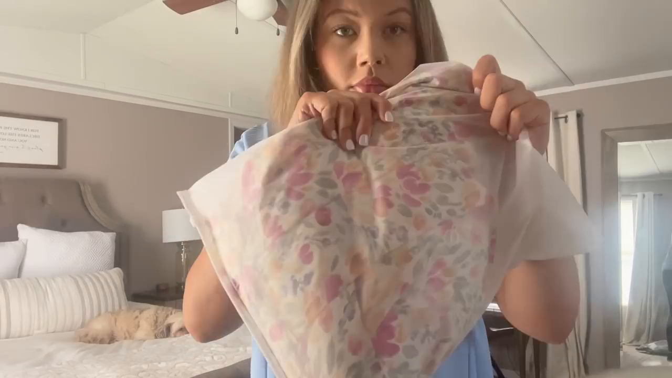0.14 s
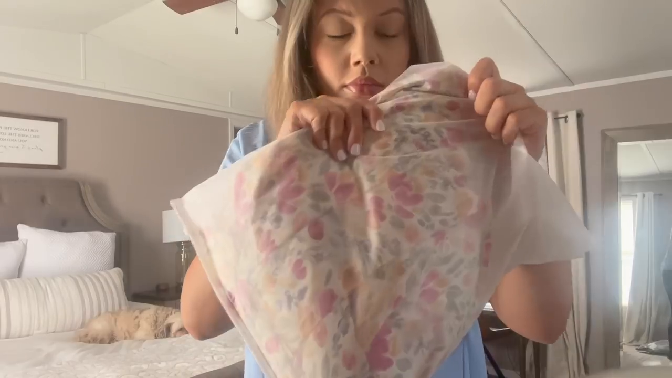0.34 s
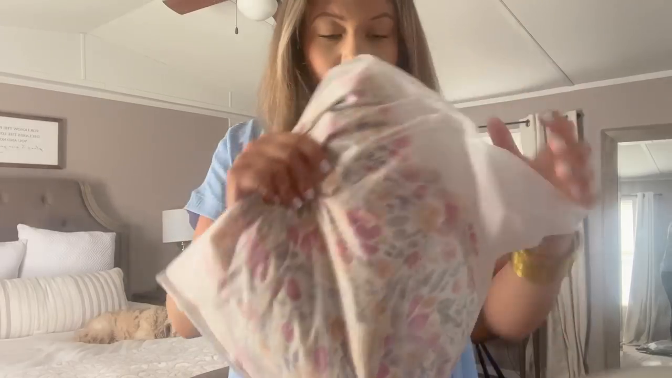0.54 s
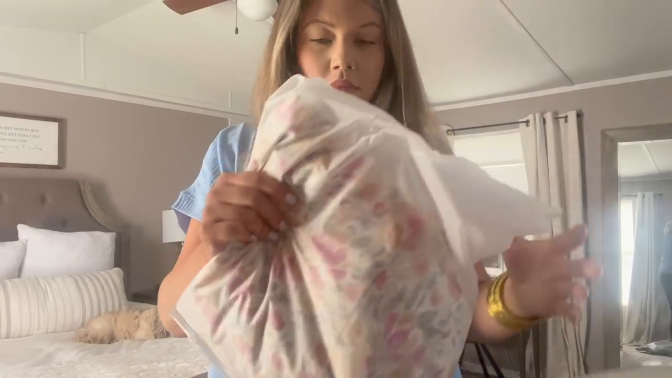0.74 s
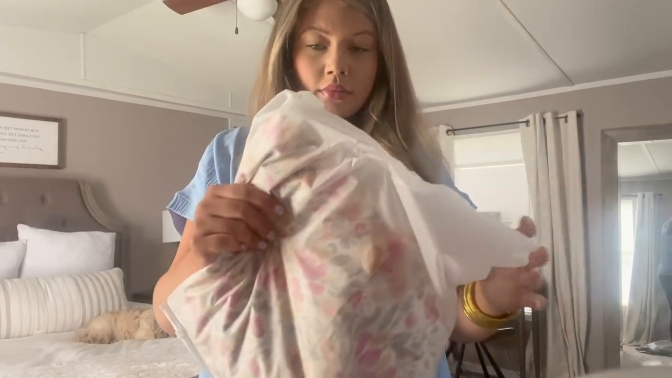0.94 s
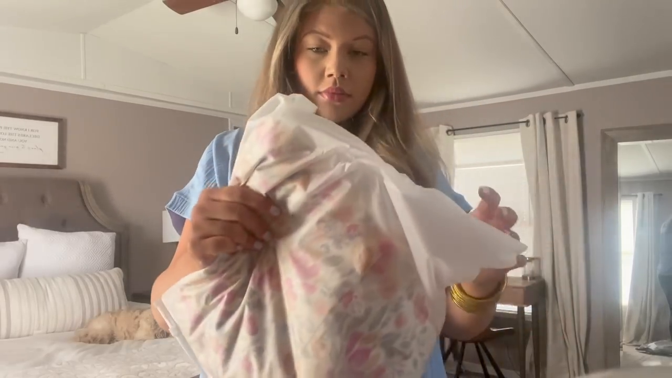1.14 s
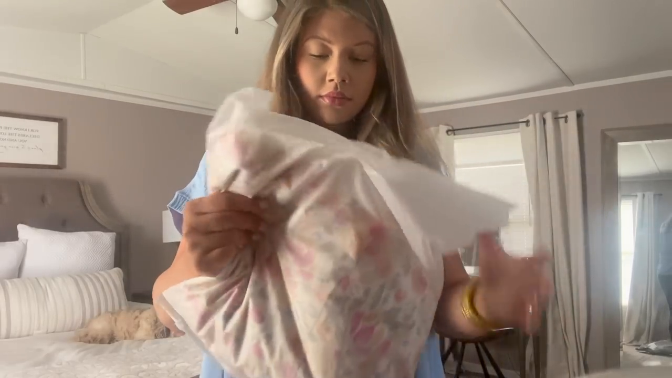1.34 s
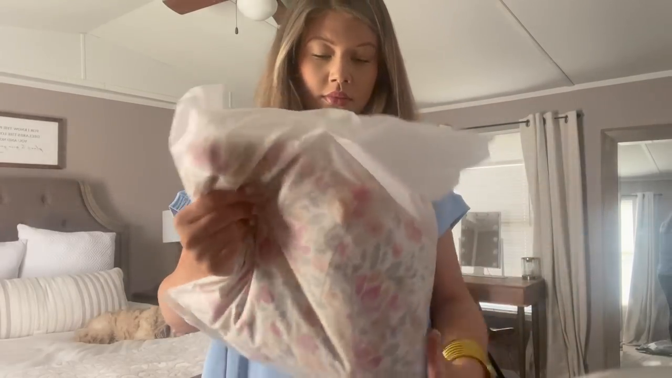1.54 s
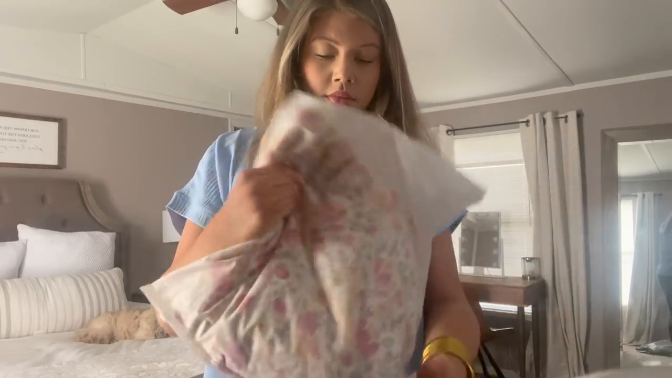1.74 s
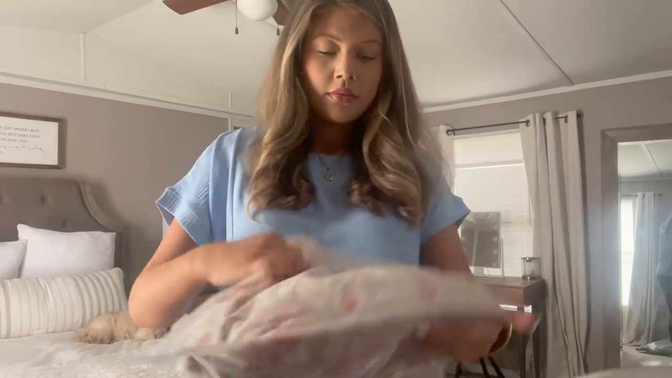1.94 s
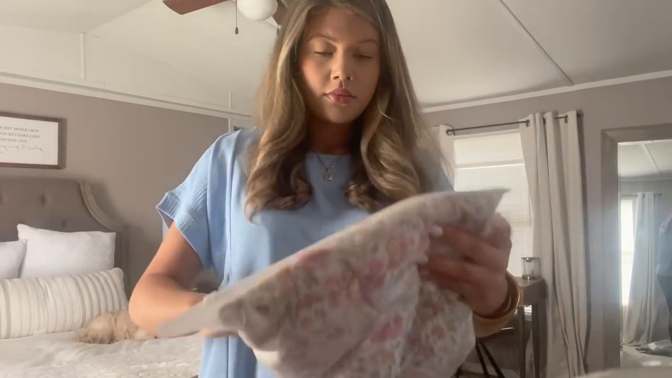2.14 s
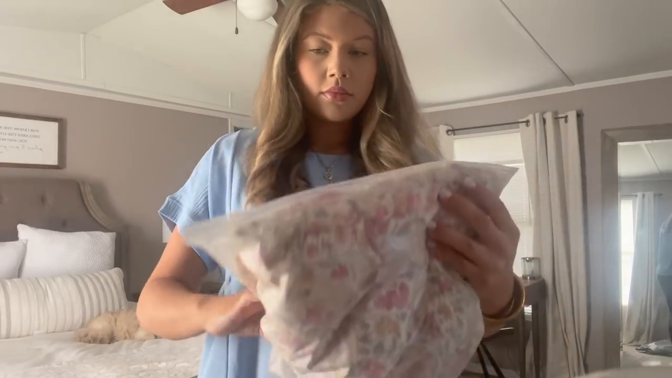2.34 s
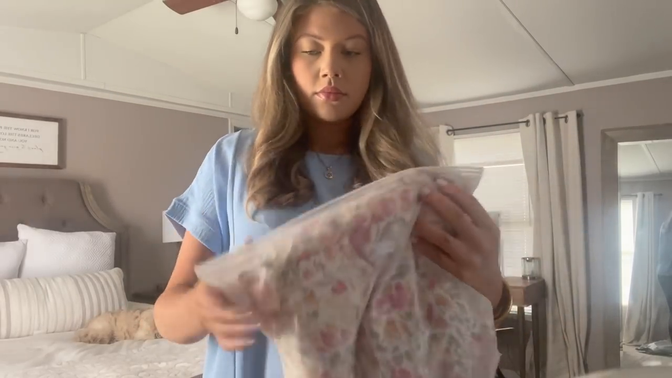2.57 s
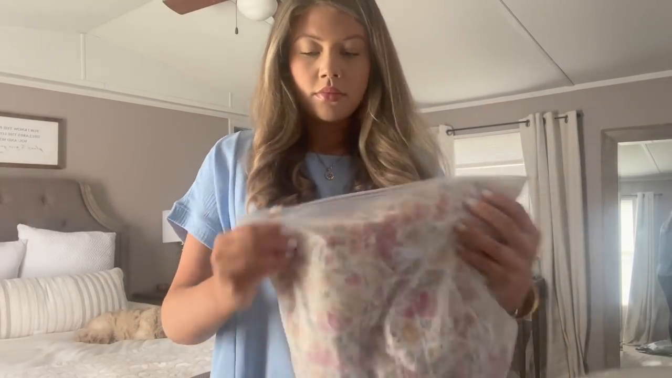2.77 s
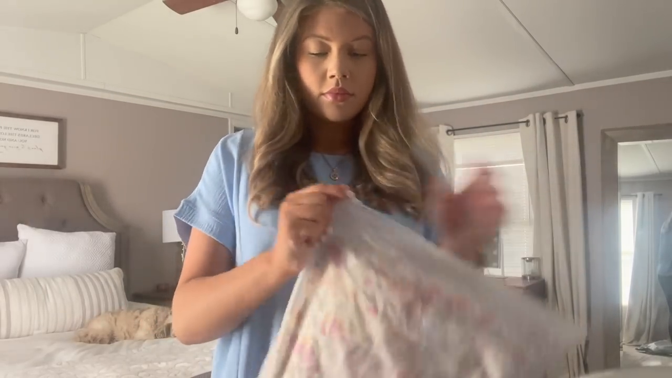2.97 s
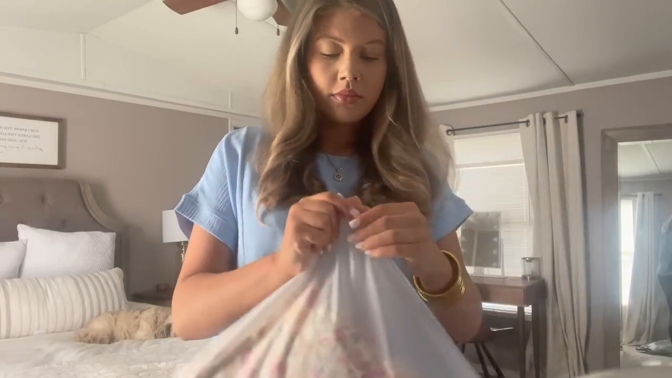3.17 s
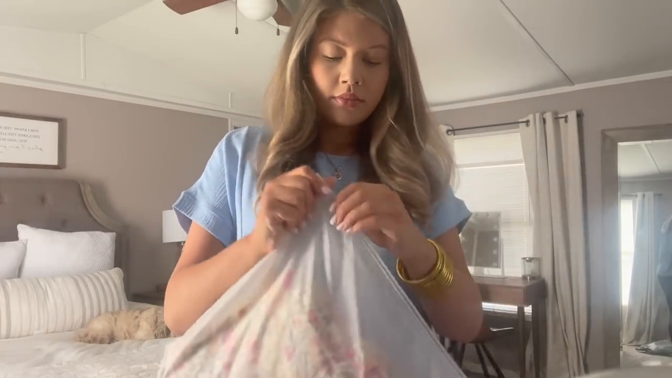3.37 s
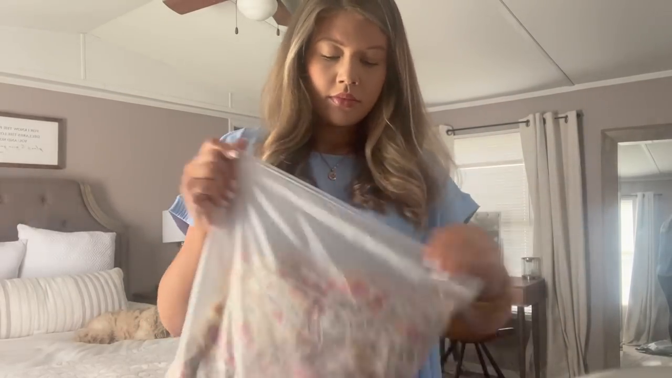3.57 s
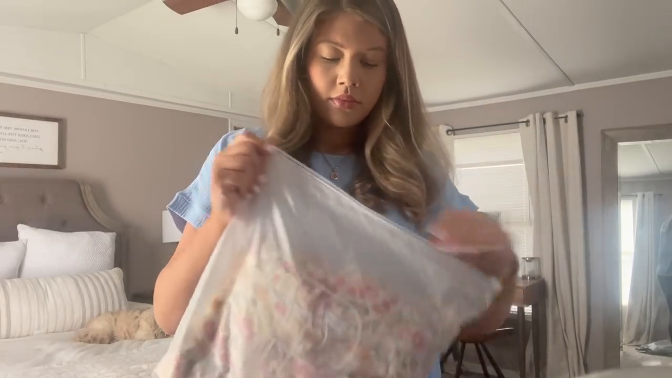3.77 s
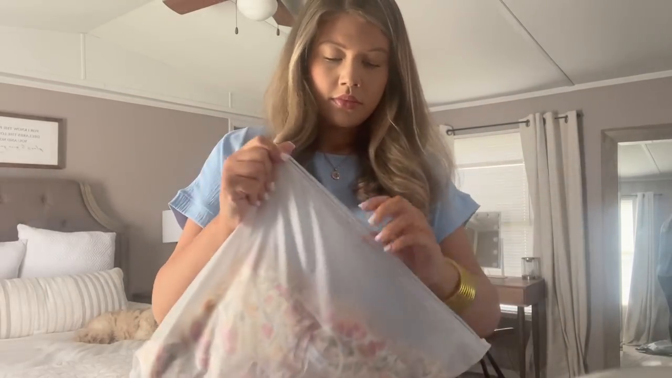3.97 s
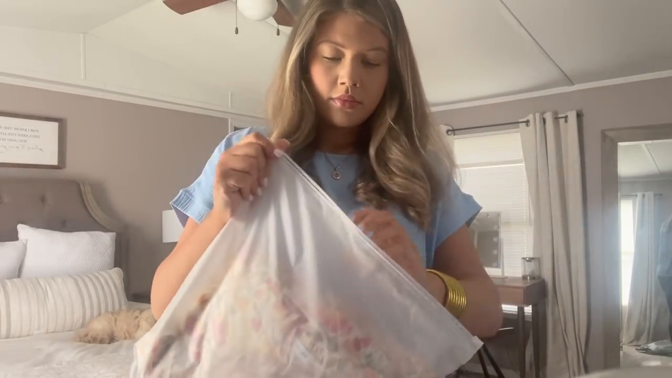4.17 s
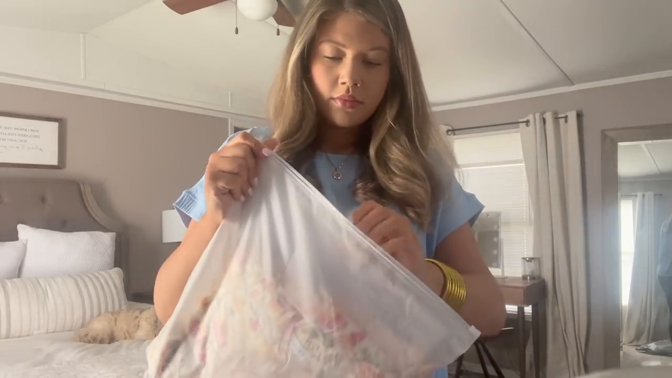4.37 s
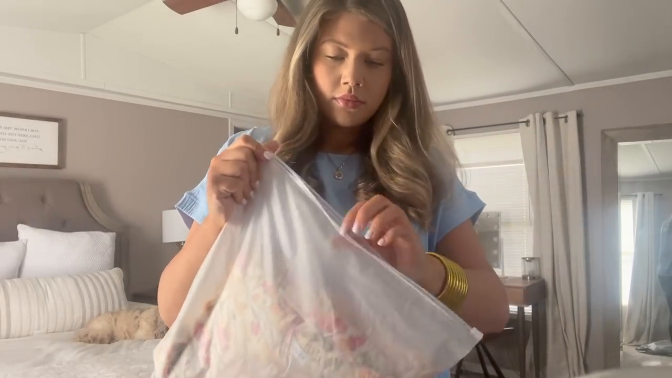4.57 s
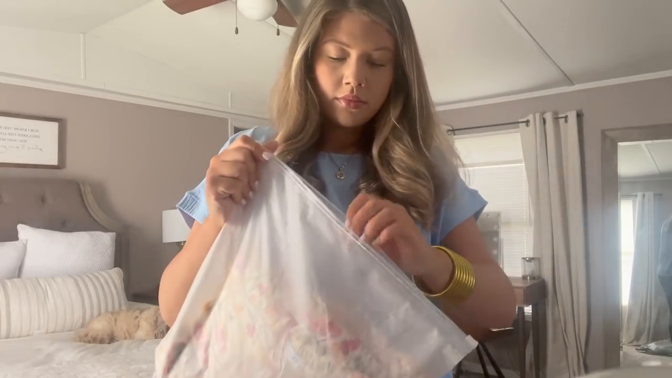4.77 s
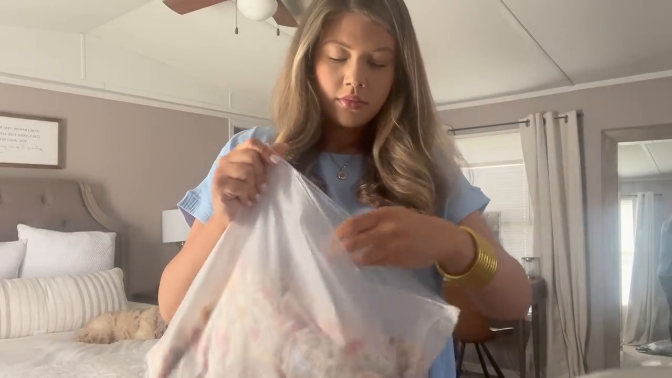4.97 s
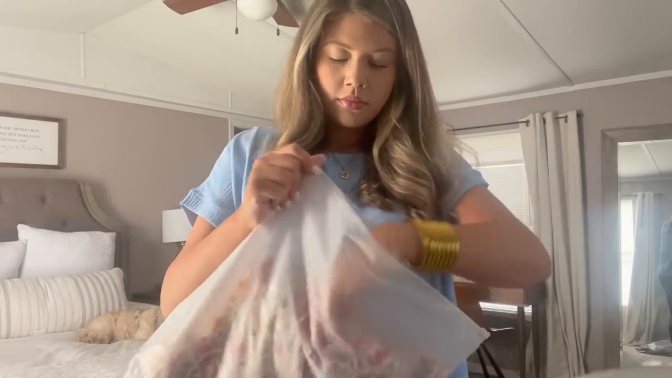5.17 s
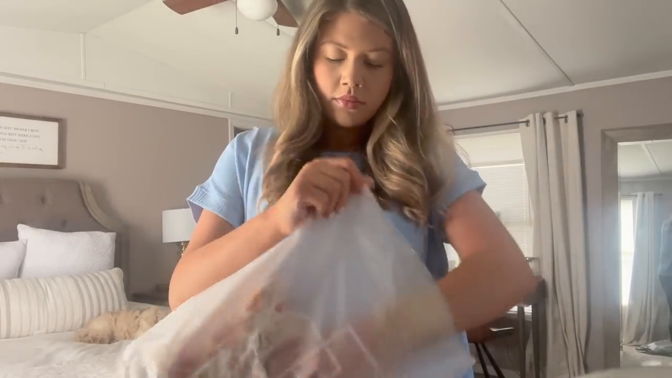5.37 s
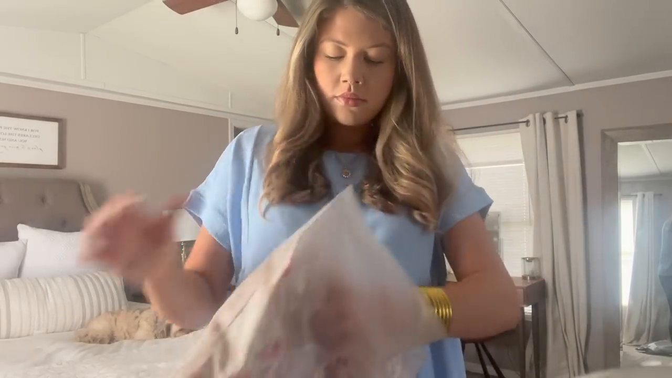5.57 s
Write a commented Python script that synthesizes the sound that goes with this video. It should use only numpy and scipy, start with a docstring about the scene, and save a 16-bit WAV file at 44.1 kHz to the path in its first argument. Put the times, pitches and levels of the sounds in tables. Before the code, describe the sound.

Thin plastic film snaps and rustles right by the microphone, with duller crumpling from the garment inside. After an early hard cut the handling comes in uneven bunches, loudest before three seconds, almost still around four and a half, then busy again with soft thumps. Small dry room, short reflections, quiet low hum.

```python
"""A quiet bedroom: hands turn, pull and open a thin plastic bag near a phone with two microphone ports.
Snapping creases are short noise bursts; a dense crackle and the duller crumple of the filled bag are
filtered grains, and soft low flops are decaying sines. Echoes of random sign make the room.
Filtered noise and a wavering mains hum lie underneath. Near the start the rustle and its echoes break
off and the hum skips in its cycle; the handling then builds up again."""
import sys
import numpy as np
from scipy import signal
from scipy.io import wavfile
from scipy.ndimage import uniform_filter1d

SR = 44100
rng = np.random.default_rng(int(sys.argv[2]) if len(sys.argv) > 2 else 0)


def wrap_up_sound(samples):
    """Save the sound to the file named by the first command line argument, as 16-bit audio."""
    columns = np.atleast_2d(samples).T
    # keep every value between -1 and 1, then stretch to whole-number steps
    tamed = np.clip(columns, -1, 1)
    steps = np.round(tamed * 32767).astype(np.int16)
    wavfile.write(sys.argv[1], SR, steps)


N = 247401  # length [samples]
BREAK_S = .141  # moment the rustle breaks off [s]


def gain_of(db):
    """Decibels to amplitude gain."""
    return 10 ** (np.asarray(db) / 20)


def evened(x):
    """Scales a signal to rms 1."""
    return x / np.sqrt(np.mean(x ** 2) + 1e-20)


def read(points, hz):
    """Reads a (frequency, value) table along a log-frequency axis."""
    f, value = np.transpose(points)
    return np.interp(np.log(hz + 1), np.log(f + 1), value)


def add(mix, s, sound):
    """Mixes a sound in from s seconds on, cut at the end of the mix."""
    part = mix[..., round(s * SR):][..., :sound.shape[-1]]
    part += sound[..., :part.shape[-1]]


def coloured(x, points):
    """Minimum-phase filter with the table's gain, so no sound comes ahead of its cause."""
    hz = abs(np.fft.fftfreq(4096, 1 / SR))
    log_gain = np.log(gain_of(read(points, hz)))
    phase = -signal.hilbert(log_gain).imag
    taps = np.fft.ifft(np.exp(log_gain + 1j * phase)).real[:2048]
    return signal.oaconvolve(x, taps)[:N]


def drift(cutoff_hz):
    """Slow random movement of rms near 1: low-passed noise at one point per 64 samples, joined by lines."""
    steps = rng.standard_normal(N // 64 + 2)
    smooth = signal.lfilter(*signal.butter(2, min(cutoff_hz * 128 / SR, .9)), steps)
    return np.interp(np.arange(N) / 64, np.arange(len(steps)), evened(smooth))


def alike(left, other, same):
    """Stereo pair whose right side shares the given part of the left, the rest being independent."""
    return np.array([left, same * left + np.sqrt(1 - same ** 2) * other])


def hum():
    """Mains hum: a sine and faint third harmonic, wavering in phase and level, with a skip at the break."""
    hum_hz, level_db, third_db = 50.23, -47, -21.0
    t = np.arange(N) / SR
    cycles = hum_hz * t + 0.014 * drift(4.2) + 0.75 * (t < BREAK_S)
    # drift moves the phase by about 0.014 cycles
    turn = 2 * np.pi * hum_hz * t + 2 * np.pi * (cycles - hum_hz * t)
    wave = np.sin(turn) + gain_of(third_db) * np.sin(3 * turn)
    side_db = np.array([[.45], [-.45]])
    return np.sqrt(2) * gain_of(level_db + 1.8 * drift(6.7) + side_db) * wave


def air():
    """Room tone: random short-time spectra, most alike on both sides in the bass."""
    # spectrum of the room tone: (frequency [Hz], relative level [dB])
    air_spectrum = [(36, -23), (62, -16), (78, 2.5), (101, -31), (146, -18.5), (203, -30), (479, -38),
                    (577, -57), (877, -59), (2870, -77), (6620, -60), (8540, -84), (11000, -64),
                    (16000, -79)]
    # left-right likeness: (frequency [Hz], likeness [0 to 1])
    air_same = [(60, 0.94), (130, 0.67), (300, 0.99), (700, 0.076), (16000, 0.022)]
    level_db = -55.5  # rms of both sides together
    frames, hz = N // 512 + 5, np.fft.rfftfreq(2048, 1 / SR)
    a, b, c, d = rng.standard_normal((frames, 1025, 4)).T
    same = np.clip(read(air_same, hz), -1, 1)[:, None]
    spectra = alike(a + 1j * b, c + 1j * d, same) * gain_of(read(air_spectrum, hz))[:, None]
    noise = signal.istft(spectra, nperseg=2048, noverlap=1536)[1][:, :N]
    return gain_of(level_db) * evened(noise)


def tail():
    """Sparse reflections of random sign, each band dying at its own speed, partly alike at both ports."""
    # decay of the echoes: (frequency [Hz], time to fall 60 dB [s])
    room_t60 = [(150, 0.2), (800, 0.061), (3000, 0.16), (12000, 0.087)]
    # likeness of the echoes at both ports: (frequency [Hz], likeness [0 to 1])
    room_same = [(100, 0.97), (300, 0.93), (700, 0.062), (3000, 0.062), (8000, 0.84), (14000, 0.99)]
    taps = np.zeros((2, SR // 2))
    at = np.arange(120, SR // 2 - 20, 20)  # one reflection in every 20 samples
    at = at + rng.integers(0, 20, (2, len(at)))
    np.put_along_axis(taps, at, rng.choice([-1., 1.], at.shape), 1)
    hz, t, (left, other) = signal.stft(taps, SR, nperseg=512, noverlap=384)
    same = np.clip(read(room_same, hz), -1, 1)[:, None]
    fall = gain_of(-60 * t / read(room_t60, hz)[:, None])
    fall /= np.linalg.norm(fall, axis=1, keepdims=True)  # the same energy in every band
    echoes = signal.istft(alike(left, other, same) * fall, SR, nperseg=512, noverlap=384)[1]
    return echoes / np.linalg.norm(echoes[0])


def room(x, tails):
    """The bag keeps moving, so its sound hands over from one set of reflections to the next."""
    # colour of the reverberation: (frequency [Hz], level [dB])
    room_level = [(150, -6), (700, -3.5), (3000, -0.5), (8000, 0), (14000, -7)]
    turn = 2 * np.pi * 1.7 * np.arange(N) / SR
    x = np.array([coloured(side, room_level) for side in x])
    wet = np.zeros((2, N))
    for k, echoes in enumerate(tails):
        part = x * np.sqrt(2 / 3) * np.cos(turn + k * np.pi / 3)
        wet += signal.fftconvolve(part, echoes, axes=1)[:, :N]
    return wet


def ports(x, scatter):
    """Two ports round the phone's body: a balance and a lag that wanders as other parts of the bag sound."""
    # mean lag between the ports: (frequency [Hz], left lead [rad])
    port_phase = [(0, 0), (340, .3), (600, 1.5), (800, -1.1), (1120, 0), (1460, .8), (3000, 1.2),
                  (4600, -1.1), (6200, -1.3), (7300, -3.1), (8700, -3.4), (10700, -6), (12500, -6.4),
                  (14500, -9.2), (17000, -9.5)]
    # balance between the ports: (frequency [Hz], left over right [dB])
    port_tilt = [(60, 1.0), (110, -0.5), (200, -1.5), (380, -0.5), (700, 4.0), (1290, -1.0), (2380, 0.0),
                 (4400, 2.0), (8120, 1.0), (15000, 0.0)]
    # wander of the lag, before scatter: (frequency [Hz], lead [rad])
    port_wander = [(100, .2), (400, .7), (700, 1.6), (1200, .5), (2000, 1.4), (4000, 1.9), (6800, 1.4),
                   (8000, .4), (9800, 1.05), (11500, .15), (12400, .15), (13700, .95), (15000, .15)]
    hz, t, z = signal.stft(x, SR, nperseg=512, noverlap=384)
    wander = rng.standard_normal((len(t), len(hz))).T
    for size, axis in [(24, 0), (24, 0), (4, 1)]:  # smoothed twice over frequency, once over time
        wander = uniform_filter1d(wander, size=size, axis=axis)
    mean_lead = np.interp(hz, *np.transpose(port_phase))[:, None]
    lead = mean_lead + scatter * read(port_wander, hz)[:, None] * evened(wander)
    half = gain_of(read(port_tilt, hz)[:, None] / 2) * np.exp(.5j * lead)  # each port takes half
    return signal.istft(z * [half, 1 / half], SR, nperseg=512, noverlap=384)[1][:, :N]


def flops():
    """Soft blows of the filled bag against hands and body push air: low sines that swell and die fast."""
    # the blows: (time [s], level before the swell and fall [dB], ring [Hz])
    blows = [(1.489, -38, 119), (1.813, -35.5, 287), (1.939, -37, 197), (2.777, -36, 282), (3.6, -28.5, 81),
             (4.892, -30.5, 316), (5.13, -49, 325), (5.251, -34, 287)]
    out, t = np.zeros(N), np.arange(8000) / SR
    for s, db, hz in blows:
        swell = 1 - np.exp(-t / .005)
        fall = gain_of(db + 2 - 900 * t)  # 900 dB per second
        add(out, s, fall * swell * np.sin(2 * np.pi * hz * t))
    return out


def effort(t):
    """How hard the bag is handled: crumple and crackle levels [dB] at the times t."""
    # the hands' work: (time [s], crumple level [dB], crackle level [dB])
    hands = [(0, -47, -49), (.06, -47.5, -53), (.138, -47.5, -44), (0.145, -100, -100), (.25, -92, -82),
             (.285, -71, -77), (.303, -60, -55.5), (.4, -49.5, -61), (.5, -58, -62), (.6, -52, -58),
             (.66, -61, -67), (.76, -59.5, -64), (.85, -66, -69), (.92, -63, -71), (.99, -73.5, -77),
             (1.025, -87, -83), (1.045, -74, -68), (1.12, -75, -80), (1.2, -71, -70.5), (1.24, -69, -61),
             (1.3, -57, -61), (1.45, -61, -65), (1.5, -55, -51.5), (1.55, -51.5, -47.5), (1.66, -58.5, -66),
             (1.71, -55, -59), (1.76, -44.5, -47.5), (1.86, -48.5, -50), (1.96, -46.5, -49),
             (2.04, -49.5, -56), (2.12, -55.5, -57.5), (2.28, -57, -62.5), (2.34, -52.5, -52.5),
             (2.4, -49, -47.5), (2.49, -53.5, -51), (2.56, -50.5, -47.5), (2.62, -45, -48),
             (2.72, -52, -49.5), (2.8, -44.5, -42.5), (2.87, -50.5, -50), (2.98, -45.5, -43.5),
             (3.1, -45, -44.5), (3.15, -53.5, -50.5), (3.2, -57.5, -59.5), (3.3, -61.5, -73),
             (3.36, -57.5, -63.5), (3.45, -52.5, -56), (3.58, -46, -42), (3.68, -47.5, -55.5),
             (3.77, -46, -69), (3.87, -50.5, -57.5), (3.93, -51, -59.5), (4.0, -69, -78), (4.02, -72, -61),
             (4.055, -60, -75), (4.07, -54.5, -62.5), (4.19, -63, -74), (4.21, -74, -75), (4.255, -70, -83),
             (4.27, -68, -69), (4.34, -81.5, -89), (4.48, -79.5, -87), (4.492, -60, -73),
             (4.58, -61.5, -70.5), (4.63, -56.5, -66), (4.72, -62, -86), (4.78, -58, -63),
             (4.87, -47.5, -58), (4.91, -44.5, -58), (5.02, -47, -54), (5.09, -48, -57),
             (5.15, -39.5, -49.5), (5.22, -45.5, -46.5), (5.275, -39.5, -42.5), (5.335, -50.5, -53.5),
             (5.39, -48, -46.5), (5.5, -46, -46), (5.6, -48.5, -52)]
    s, crumple_db, crackle_db = np.transpose(hands)
    return np.interp(t, s, crumple_db), np.interp(t, s, crackle_db)


def grains(per_s, spread_db, clump_db, clump_hz, smooth):
    """Tiny buckles of many sizes that come in clumps, over the even hiss of film sliding on film."""
    sizes = gain_of(spread_db * np.minimum(rng.exponential(1, N), 3))
    struck = rng.random(N) < per_s / SR
    buckles = evened(sizes * rng.choice([-1, 1], N) * struck)
    hiss = smooth * rng.standard_normal(N)
    return (buckles + hiss) * gain_of(clump_db * drift(clump_hz))


def handling():
    """Dull crumple of the filled bag and bright crackle of its film: filtered grains that follow the hands."""
    # colour of the crumple: (frequency [Hz], relative level [dB])
    crumple_spectrum = [(60, -18), (120, -6), (285, -1), (600, -3), (1200, -6), (1800, -15.5), (3000, -14),
                        (4500, -21.5), (7000, -36)]
    # colour of the crackle: (frequency [Hz], relative level [dB])
    crackle_spectrum = [(300, -20.5), (1000, 7.5), (2000, 4), (4000, 1.2), (6000, 4), (8500, 0.5),
                        (11000, -3.5), (13000, 3), (15500, -9.5), (16000, -18)]
    crumple_db, crackle_db = effort(np.arange(N) / SR)
    dull = grains(per_s=700, spread_db=4., clump_db=2.5, clump_hz=35, smooth=.6)
    bright = grains(per_s=1900, spread_db=4.0, clump_db=0.0, clump_hz=74.0, smooth=1.0)
    crumple = evened(coloured(dull, crumple_spectrum))
    crackle = evened(coloured(bright, crackle_spectrum))
    return gain_of(crumple_db) * crumple + gain_of(crackle_db) * crackle


def small_snaps():
    """Lesser creases flip at random moments, as strong as the handling allows."""
    count, pitch_scatter_db = 160, 2.0  # the scatter turns into a frequency ratio
    s, luck = rng.random(count) * N / SR, rng.standard_normal((count, 5))
    crumple_db, crackle_db = effort(s)
    crack_db = crackle_db - 2.5 + luck[:, 0]
    puff_db = crumple_db + 2 + luck[:, 1]
    edge_db = crackle_db - 11 + luck[:, 2]
    crack_hz = 3300 * gain_of(pitch_scatter_db * luck[:, 3])
    puff_hz = 850 * gain_of(pitch_scatter_db * luck[:, 4])
    return np.c_[s, crack_db, crack_hz, puff_db, puff_hz, edge_db]


def burst(chance, hz, spread, t60, flip, order):
    """A jolt, a dying puff of noise and a faint crackle of settling film, in a band round hz, peak 1."""
    rise_s, fray_db, fray_t60 = .0004, -26, .02
    t = np.arange(len(chance)) / SR
    band = signal.butter(order, np.clip([hz / spread, hz * spread], 50, 16000), "band", fs=SR)
    jolt = flip * (np.arange(len(t)) == round(rise_s * SR))  # a single sample
    fray = gain_of(fray_db - 60 * t / fray_t60) * abs(chance[::-1])
    fall = gain_of(-60 * t / t60) + fray
    rise = np.minimum(t / rise_s, 1) ** 2
    sound = signal.lfilter(*band, (chance + jolt) * rise * fall)
    return sound / abs(sound).max()


def snaps():
    """A crease flips: a broad dry crack with a sharp edge, and a duller puff from the panel around it."""
    # the loudest creases: (time [s], crack level [dB], crack pitch [Hz],
    # puff level [dB], puff pitch [Hz], sharp edge level [dB])
    big_snaps = [(0.0393, -26.5, 4100, -36, 1130, -43), (0.0427, -28, 3400, -47, 795, -56),
                 (0.0863, -22, 4270, -49, 1330, -37), (0.1181, -36, 4400, -39, 970, -46),
                 (0.1254, -28, 3270, -43, 1010, -54), (0.1316, -16, 4500, -27.5, 1610, -24),
                 (0.1355, -30, 3180, -58, 1510, -46), (0.301, -39, 4900, -46, 1090, -56),
                 (0.326, -33, 3280, -39.5, 1570, -61), (0.336, -44, 5600, -55, 900, -60),
                 (0.352, -42, 3600, -38, 1090, -60), (0.3815, -33.5, 4050, -30.5, 845, -63),
                 (0.389, -32, 3100, -31.5, 1460, -48), (0.4112, -34, 3800, -37, 1160, -58),
                 (0.4252, -39.5, 3400, -49, 1140, -56), (0.4288, -39, 2200, -33, 1180, -56),
                 (0.4409, -16.5, 3330, -27.5, 1310, -46), (0.5312, -21, 3830, -29.5, 980, -45),
                 (0.5858, -36, 2610, -44, 930, -57), (0.6756, -42, 4100, -64, 1240, -61),
                 (0.6796, -34, 3080, -38, 730, -42), (0.6839, -37, 3600, -42, 790, -62),
                 (0.7497, -39, 4500, -55, 920, -67), (0.7775, -46, 3500, -39, 1200, -67),
                 (0.7844, -35, 2900, -37.5, 1140, -68), (0.7916, -45, 2600, -45, 834, -68),
                 (0.8327, -47, 2600, -40, 1160, -70), (0.8686, -47, 3400, -68, 1030, -65),
                 (0.9005, -55, 3100, -41.5, 730, -69), (0.913, -60, 2600, -61, 950, -70),
                 (0.955, -64, 2500, -53, 790, -70), (1.037, -58, 3500, -62, 1500, -57),
                 (1.054, -60, 4000, -56, 900, -70), (1.111, -55, 3300, -60, 800, -72),
                 (1.199, -60, 2400, -55, 1300, -70), (1.147, -60, 2200, -47.5, 840, -78),
                 (1.2341, -48, 3000, -56, 1220, -62), (1.2382, -36, 5740, -48, 1000, -53),
                 (1.251, -37, 3100, -40, 816, -45), (1.2727, -44, 4900, -58, 660, -43.5),
                 (1.3114, -39, 4700, -49, 740, -60), (1.4085, -39.5, 4200, -44, 1070, -58),
                 (1.4145, -29, 5540, -39, 1000, -59), (1.4524, -34.5, 3780, -41.5, 900, -61),
                 (1.4579, -50, 2900, -51, 970, -62), (1.4961, -18.5, 4700, -36, 1290, -31),
                 (1.5017, -33, 6400, -40, 1260, -52), (1.526, -25, 3800, -44, 1020, -42),
                 (1.5294, -37, 3300, -38, 1100, -35), (1.5442, -25, 3700, -35, 1350, -36),
                 (1.5477, -18, 6000, -51, 1220, -43), (1.5587, -40, 3700, -32, 1350, -40),
                 (1.5792, -41, 2600, -37.5, 785, -42), (1.6077, -55, 3000, -41, 860, -52),
                 (1.6716, -50, 2600, -40.5, 1050, -42), (1.703, -28, 6000, -51, 770, -49),
                 (1.7271, -35, 3200, -33.5, 820, -50), (1.7301, -33, 4100, -39, 970, -40),
                 (1.7443, -38, 2600, -38, 1400, -55), (1.7535, -27, 6000, -46, 740, -33),
                 (1.7666, -36, 3700, -31, 1030, -41), (1.7809, -29, 5360, -31.5, 670, -43),
                 (1.8204, -26, 3400, -27, 830, -37), (1.8238, -42, 3400, -28, 875, -57),
                 (1.8313, -28, 6100, -47, 880, -40), (1.8463, -28, 4500, -34, 1310, -42),
                 (1.8674, -38, 5600, -27, 1100, -46), (1.892, -23, 4700, -45, 1090, -36),
                 (1.938, -27, 4300, -30, 760, -58), (1.9432, -35, 5200, -37, 790, -50),
                 (1.9694, -9.5, 4660, -31.5, 1230, -34), (2.0626, -22.5, 4400, -33, 1260, -42),
                 (2.0684, -44, 4600, -48, 1070, -30), (2.1082, -26, 5400, -60, 1060, -40),
                 (2.1598, -53, 2380, -33.5, 1130, -61), (2.2718, -26, 6500, -60, 590, -54),
                 (2.286, -29, 5470, -33.5, 1440, -56), (2.3596, -27, 2500, -27.5, 1220, -26.5),
                 (2.3645, -43, 3100, -44, 1090, -36), (2.3802, -17, 4300, -36, 1220, -38),
                 (2.391, -47, 4000, -29, 1120, -53), (2.3929, -31, 5500, -37, 1200, -41),
                 (2.3972, -20, 4700, -48, 1080, -40), (2.4207, -16.5, 3470, -24.5, 1250, -27),
                 (2.4262, -35, 4000, -44, 1270, -30), (2.4311, -30, 5500, -41, 1180, -39),
                 (2.4994, -15, 5050, -24, 1140, -35), (2.5109, -53, 3000, -26.5, 1100, -42),
                 (2.529, -19, 5160, -28.5, 935, -25), (2.567, -31, 6200, -45, 1140, -41),
                 (2.5878, -30, 4100, -28, 950, -42), (2.5914, -26, 4670, -35, 1040, -34),
                 (2.6062, -20, 4200, -25.5, 724, -32), (2.6107, -14, 5700, -31, 840, -36),
                 (2.638, -39, 4900, -42, 1120, -48), (2.6597, -40, 5100, -31, 980, -48),
                 (2.684, -38, 4100, -50, 910, -48), (2.6893, -17, 4940, -36, 1200, -35),
                 (2.694, -47, 3700, -50, 1400, -46), (2.7021, -43, 3000, -40, 770, -46),
                 (2.7256, -15.5, 5640, -50, 1170, -49), (2.7287, -12, 5470, -32.5, 1100, -45),
                 (2.744, -36, 5400, -47, 1250, -39), (2.7638, -37, 5300, -32.5, 920, -52),
                 (2.7803, -5, 3640, -22.5, 1150, -42), (2.7848, -21, 3300, -29, 950, -43),
                 (2.791, -27, 4600, -38, 1010, -33), (2.7943, -18, 3200, -31, 1220, -40),
                 (2.8026, -14.5, 3900, -41, 970, -25.5), (2.8068, -32, 4130, -49, 830, -47),
                 (2.9004, -21, 4600, -34, 1100, -39), (2.9062, -30, 5200, -41, 1430, -41),
                 (2.9214, -22, 5200, -43, 620, -38), (2.9522, -31, 3500, -32.5, 1190, -44),
                 (2.964, -49, 3100, -35, 1090, -49), (3.043, -50, 3500, -35, 990, -45),
                 (3.055, -40, 3500, -40, 1200, -36), (3.0681, -50, 3720, -31, 764, -27),
                 (3.105, -36, 3500, -35, 990, -29), (3.1929, -35, 3380, -37.5, 1390, -35),
                 (3.2578, -31.5, 6040, -60, 790, -31), (3.2614, -59, 5100, -69, 940, -45),
                 (3.3262, -63, 3320, -63, 910, -57), (3.372, -26, 3800, -35, 1330, -45),
                 (3.376, -45, 2900, -41, 1000, -51), (3.3984, -29, 4140, -32.5, 1180, -48),
                 (3.4662, -52, 3800, -31.5, 990, -40), (3.5399, -20, 3330, -28.5, 1190, -53),
                 (3.5613, -23, 4700, -50, 1340, -40), (3.576, -22.5, 4570, -52, 1170, -46.5),
                 (3.607, -25, 3500, -25, 1240, -42.5), (3.6107, -24, 2690, -35, 1080, -43),
                 (3.6269, -23, 4300, -34, 470, -44), (3.7105, -23.5, 4140, -40, 900, -61),
                 (3.7198, -29, 3520, -33, 880, -58), (3.7239, -28, 2780, -36, 790, -61),
                 (3.735, -49, 3700, -33, 1050, -68.5), (3.7665, -31.5, 5270, -47, 900, -54),
                 (3.7766, -57, 2600, -46, 590, -66), (3.7859, -33, 4000, -59, 1000, -51),
                 (3.8382, -34, 3600, -45, 880, -43), (3.843, -31, 3800, -40, 694, -37),
                 (3.857, -36, 3400, -36, 1330, -56), (3.8612, -42, 2400, -36, 1400, -60.5),
                 (3.9037, -33, 3200, -35.5, 1350, -48), (3.9865, -65, 2300, -69, 570, -64),
                 (4.0127, -44, 5200, -64, 500, -48), (4.0181, -44, 5800, -71, 520, -60),
                 (4.0354, -37, 4200, -62, 1070, -57), (4.0628, -33, 3970, -43, 900, -59),
                 (4.075, -53, 6000, -69, 900, -58), (4.085, -50, 2900, -62, 1100, -60),
                 (4.158, -57, 3800, -51, 1090, -58), (4.1828, -49, 2380, -70, 710, -77.5),
                 (4.2587, -43, 4060, -59, 1100, -48), (4.2632, -48.5, 3970, -51, 1260, -49),
                 (4.36, -71, 2200, -72, 800, -77), (4.385, -69, 2000, -62, 950, -77),
                 (4.42, -73, 2300, -77, 900, -78), (4.49, -55, 3500, -62, 860, -59),
                 (4.516, -53, 2400, -55, 1240, -65), (4.533, -57, 2400, -45.5, 1000, -63),
                 (4.5408, -45, 2500, -39.5, 1150, -56), (4.6068, -32, 4870, -61, 860, -40),
                 (4.6286, -39, 3020, -38.5, 1080, -62), (4.7421, -59, 3400, -60, 1260, -71),
                 (4.7881, -37, 3150, -43, 910, -50), (4.804, -38, 3100, -32.5, 1050, -47),
                 (4.844, -30, 3830, -36, 580, -64), (4.8914, -34, 3400, -30.5, 580, -59),
                 (4.9186, -39, 3900, -36, 700, -59), (4.945, -25, 2880, -27, 1150, -50),
                 (4.9664, -53, 2800, -58, 770, -63), (4.9918, -42, 3700, -42, 1220, -49),
                 (5.016, -32, 2900, -35, 1240, -43), (5.0246, -46, 2900, -30, 1340, -44),
                 (5.103, -30, 3050, -32, 1290, -59), (5.1207, -35, 2400, -30.5, 950, -58),
                 (5.1341, -35, 2700, -33, 1120, -47), (5.1425, -43, 2500, -32, 710, -53),
                 (5.1489, -32, 3000, -24, 840, -47), (5.1692, -33, 2850, -26, 1180, -37),
                 (5.176, -50, 2500, -30, 810, -50), (5.2508, -24.5, 3900, -47, 1140, -47),
                 (5.2538, -41, 3220, -23, 826, -38), (5.2581, -46, 3400, -29, 680, -40),
                 (5.2828, -26.5, 4400, -26.5, 1120, -46), (5.3544, -39, 2300, -36, 1410, -50),
                 (5.3622, -29, 3020, -25, 1220, -46), (5.3798, -13.5, 4280, -30, 1190, -49),
                 (5.41, -55, 4200, -48, 650, -33), (5.4681, -41, 4600, -32, 746, -26.5),
                 (5.4725, -35, 3500, -42, 910, -43), (5.5052, -32, 4700, -42, 890, -31),
                 (5.5218, -25, 3100, -30, 845, -48), (5.5466, -46, 2800, -41, 870, -56),
                 (5.552, -21, 6300, -28, 1130, -38), (5.5556, -40, 4200, -49, 880, -38),
                 (5.5911, -17.5, 4030, -55, 1100, -41.5)]
    rows = np.r_[small_snaps(), big_snaps]
    side_scatter_db = 2.0  # left over right
    out, chance = np.zeros((2, N)), rng.standard_normal((len(rows), 3, 1200))
    for (s, crack_db, crack_hz, puff_db, puff_hz, edge_db), (a, b, c) in zip(rows, chance):
        # the jolt over the noise: 7 for strong cracks, half at -22 dB, none for weak ones
        flip = 7 * np.clip(0.5 + (crack_db + 22) / 25, 0, 1)
        crack = gain_of(crack_db) * burst(a, crack_hz, spread=2.1, t60=.005, flip=flip, order=1)
        puff = gain_of(puff_db) * burst(b, puff_hz, spread=1.72, t60=0.014, flip=flip, order=2)
        edge = gain_of(edge_db) * burst(c, 11800, spread=1.25, t60=.005, flip=flip, order=2)
        side = gain_of(np.array([[.5], [-.5]]) * side_scatter_db * c[-1])
        add(out, s, side * (crack + puff + edge))
    return out


def scene():
    """Bag, room and hum together; no snap or reverberation rings on past the break."""
    near_room_db = -10  # the snaps face the phone, so less of them reaches the walls
    t = np.arange(N) / SR
    rustle = handling() + flops()
    tails = [tail() for k in range(3)]
    near = snaps() * (abs(t - BREAK_S - .05) > .05)  # silent for 0.1 s from the break
    bag, first = gain_of(near_room_db) * near + rustle, t < BREAK_S
    wet = np.where(first, room(bag * first, tails), room(bag * ~first, tails))
    around = ports(gain_of(2.5) * (rustle + wet) + air(), scatter=1)
    close = ports(near, scatter=.45)  # loud creases lie by the hands, in front of the phone
    return gain_of(1.0) * close + around + hum()


def record(dry):
    """The band limit: a steep low-pass at 16.7 kHz."""
    low_pass = signal.firwin(511, 16700, window=("kaiser", 9), fs=SR)
    return signal.oaconvolve(dry, low_pass[None], "same")


dry = scene()
out = record(dry)
wrap_up_sound(out)
```